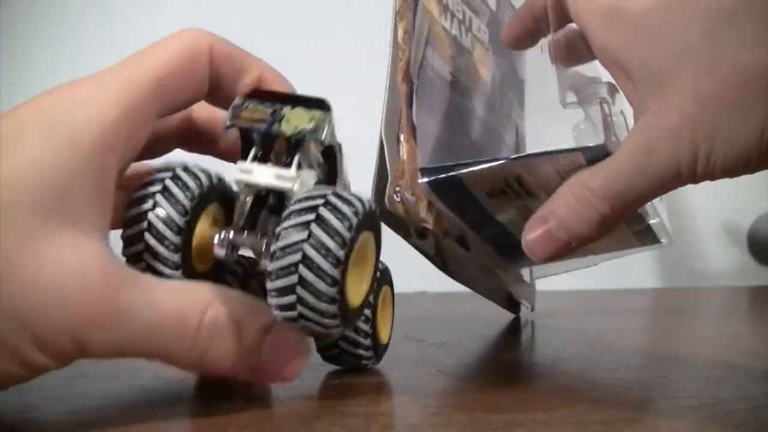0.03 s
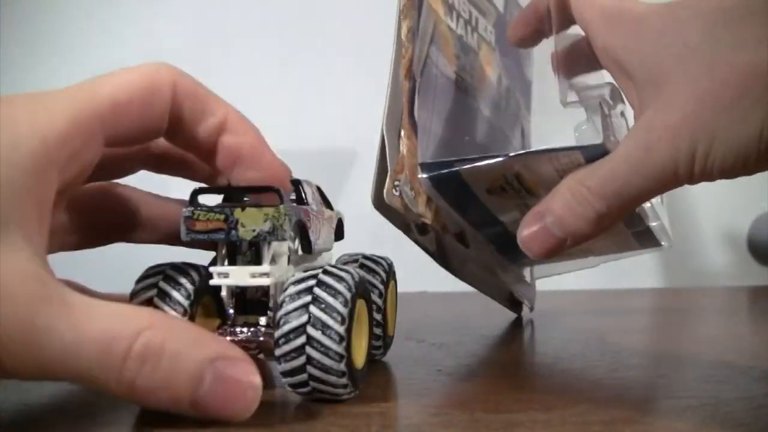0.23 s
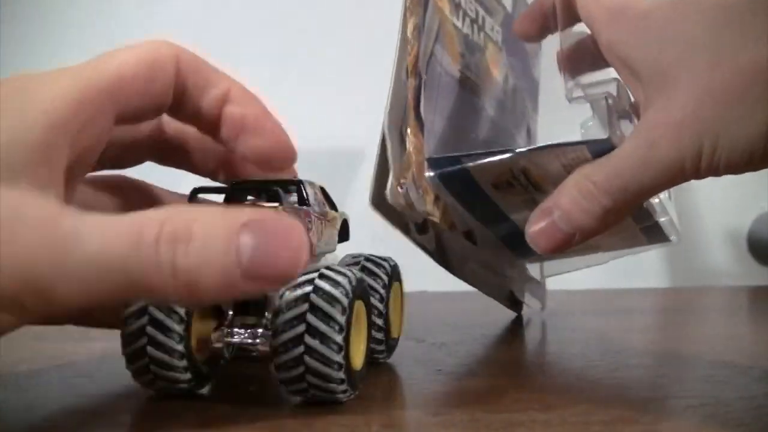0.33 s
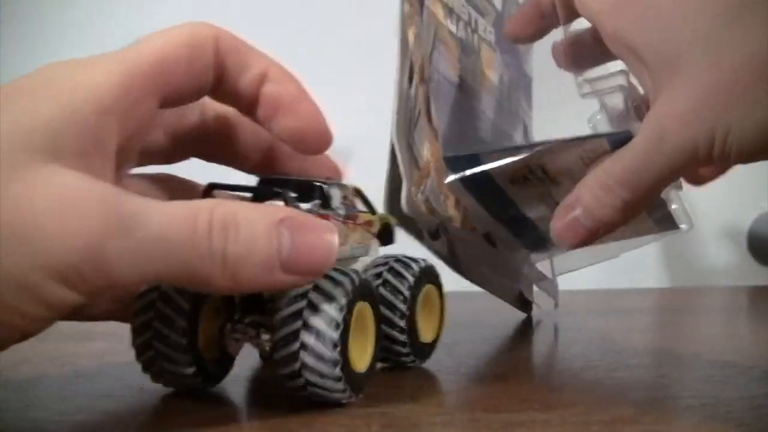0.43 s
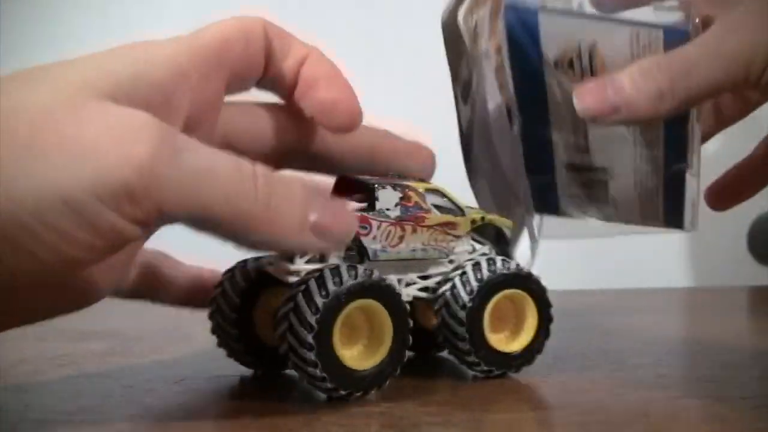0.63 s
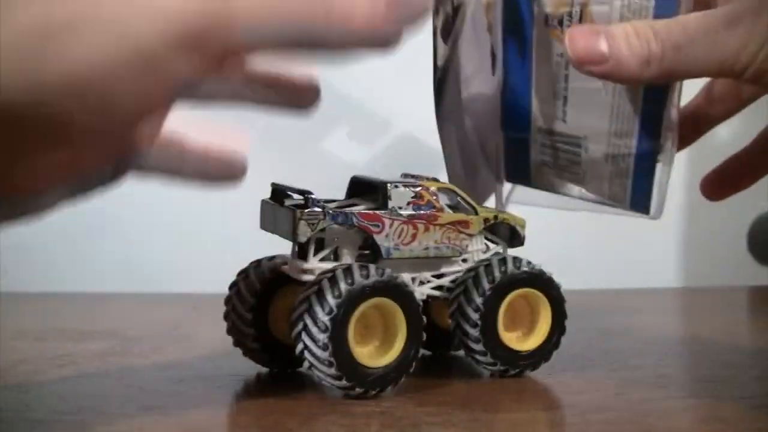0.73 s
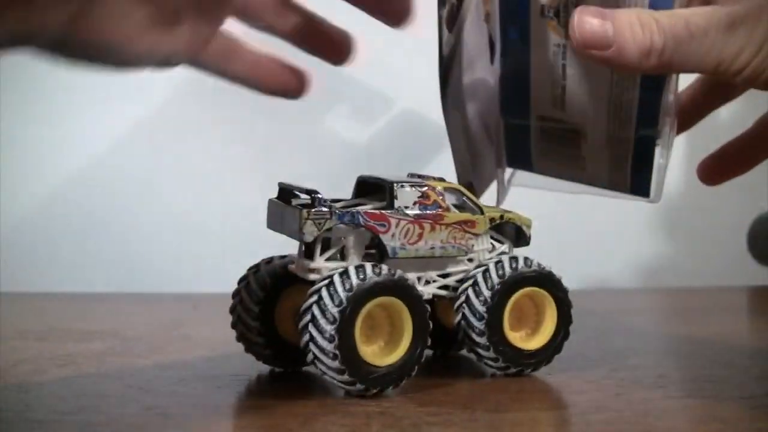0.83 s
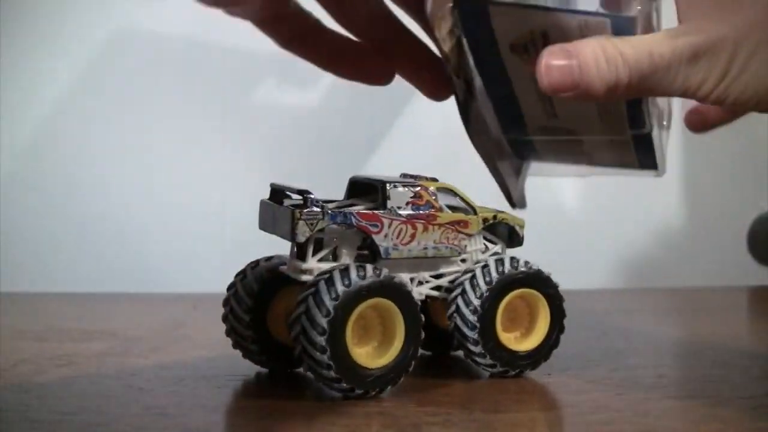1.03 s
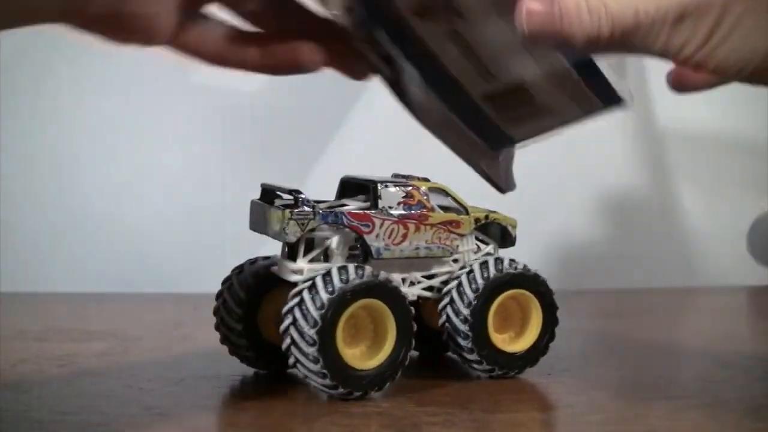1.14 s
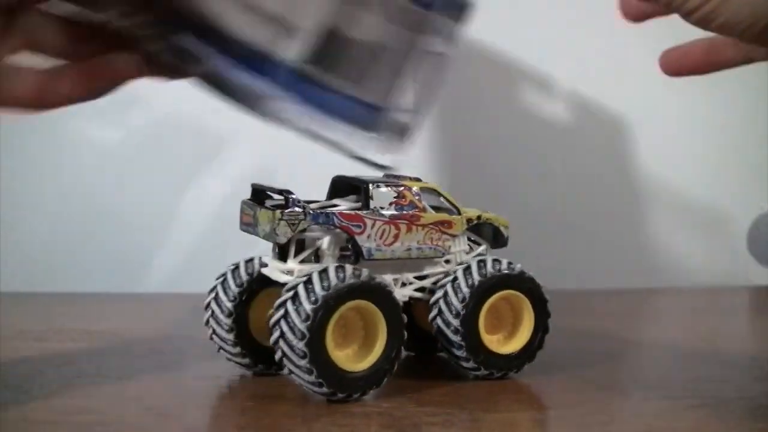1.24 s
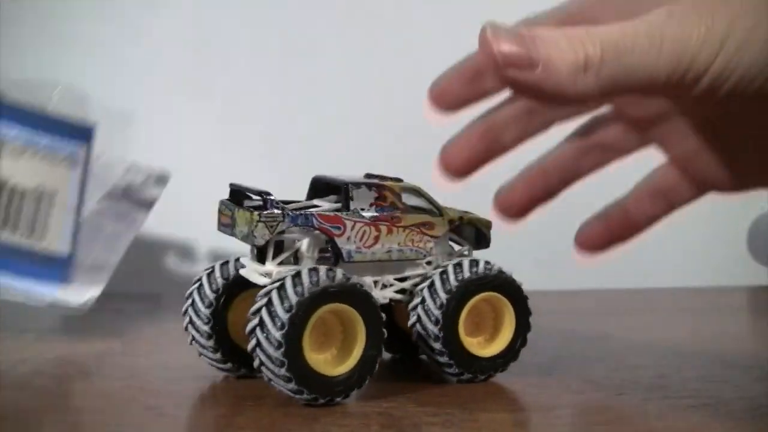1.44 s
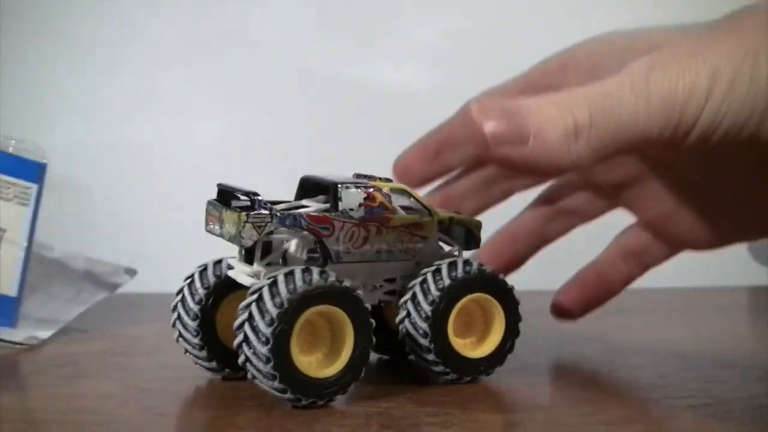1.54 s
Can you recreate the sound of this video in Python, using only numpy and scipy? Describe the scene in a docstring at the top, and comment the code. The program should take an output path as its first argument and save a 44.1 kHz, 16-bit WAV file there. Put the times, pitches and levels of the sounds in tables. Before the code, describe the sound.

Stiff blister packaging knocks, crackles and rustles, just after a small toy truck lands on a table

```python
"""A brief rub of the hands over a faint background, then a toy truck set down on a wooden table in a small
room, close to a two-port microphone: axles clink, wheels land and tyres rumble. A torn card and plastic
blister pack then knocks on the table and is carried off, snapping, crackling and rustling in the hands.
Contacts are filtered pushes with chatter and ringing modes; rolling and rubbing are random tiny slips;
the background is coloured noise. A short diffuse room tail surrounds truck and pack."""
import sys
import numpy as np
from scipy import signal
from scipy.fft import rfft, irfft
from scipy.io import wavfile

SR = 44100
rng = np.random.default_rng(int(sys.argv[2]) if len(sys.argv) > 2 else 0)


def inscribe(sig):
    """Save sig as 16-bit PCM at rate SR to the path in sys.argv[1].

    A 1-D sig is mono; a 2-D sig holds one channel per row.
    Samples are clipped to [-1, 1] before scaling.
    """
    pcm = np.round(np.clip(np.atleast_2d(sig).T, -1, 1) * 32767)
    wavfile.write(sys.argv[1], SR, pcm.astype(np.int16))


N = 70560  # samples, 1.6 s
HZ = np.fft.rfftfreq(8192, 1 / SR)
T = np.arange(N) / SR

# Quiet background of the place: pitch_hz, level_db
FLOOR_COLOUR = [(25, -31), (70, -17.5), (160, -1.5), (400, 5), (800, -0.5), (1300, -3), (4000, -19.5),
                (12000, -39), (16000, -62)]
FLOOR_DB, FLOOR_SIDE_DB = -56, 5  # mid level; side against mid

# Card and plastic rubbing in the hands: time_s, level_db
RUB_LEVELS = [(0, -36.5), (.03, -82), (.19, -59), (.4, -60), (.47, -48.5), (.5, -49), (.59, -47.5),
              (.7, -57.5), (.8, -58.5), (.96, -58.5), (1.015, -43.5), (1.045, -58), (1.13, -48),
              (1.18, -43.5), (1.26, -47), (1.31, -51), (1.36, -60.5), (1.5, -53), (1.6, -59.5)]
# Spectrum of that rubbing: pitch_hz, level_db
RUB_COLOUR = [(60, -51), (250, -5), (550, -5), (700, 2.5), (880, 4.5), (1050, -9.5), (2000, -7),
              (3000, -14.5), (4550, -15.5), (5100, -23.5), (11000, -25), (16000, -38)]
# Fine hiss of sliding skin and film: time_s, level_db
HISS_LEVELS = [(0, -55), (.07, -58.5), (.19, -58.5), (.34, -67), (.42, -66.5), (.47, -58), (.51, -60),
               (.6, -54), (.68, -62), (.8, -68), (.96, -71), (1.02, -53.5), (1.12, -61), (1.19, -55),
               (1.27, -54.5), (1.36, -68), (1.55, -66.5), (1.6, -54.5)]
# Spectrum of that hiss: pitch_hz, level_db
HISS_COLOUR = [(500, -3.5), (4000, -7), (6000, -6.5), (9000, -4.5), (11500, -5.5), (14500, -14),
               (16000, -31)]

# Tyres rumbling on the wood: time_s, level_db
ROLL_LEVELS = [(0, -79), (.08, -51.5), (.13, -34.5), (.185, -53.5), (.21, -42.5), (.33, -48), (.405, -71),
               (.44, -41), (.485, -35), (.503, -39), (.55, -37.5), (.645, -37.5), (.72, -52.5), (.79, -59),
               (.83, -50), (.86, -67), (1.54, -60), (1.575, -45.5), (1.6, -44)]
# Spectrum of the rumble: pitch_hz, level_db
ROLL_COLOUR = [(30, -65), (90, -29), (140, -11.5), (172, 1), (215, 2.5), (255, -10), (310, -3.5),
               (520, -23.5), (750, -18.5), (1100, -30.5), (4000, -49), (16000, -49.5)]

# Loose axles clinking: start_s, level_db, bass_db, treble_db
CLINKS = [(.0933, -13.5, 5, 4), (.0962, -12, -36, 4), (.1113, -18, -8, 4), (.1237, -14, -1, 4),
          (.137, -19, -9, -4), (.2025, -23, 21, 3.5), (.2125, -18, -20, 0.5), (.2175, -1.5, -4.5, -7)]
# Spectrum of the clink contact: pitch_hz, level_db
CLINK_COLOUR = [(40, -15), (200, -30), (450, 7), (750, 9.5), (2200, -2.5), (4200, 8.5), (5200, -1),
                (8000, -1.5), (11500, -2), (13500, -16), (16000, -21)]
# Modes of the axle: pitch_hz, level_db, t60_s
AXLE_MODES = [(208, 13, 0.27), (3120, 8, 0.06), (3880, 21, 0.16), (4270, 7, .06), (4530, 15, 0.06),
              (6650, 9, 0.025)]

# Wheels and chassis hitting the table: start_s, level_db, bass_db, treble_db
LANDINGS = [(.2218, 24.5, -3, -6.5), (.2245, 31.5, 3.5, -19.5), (.2293, 21.5, 7, 3), (.236, 13.5, 1, -28),
            (.2445, 13.5, 5.5, -6.5), (.2612, 13, 15, -1.5), (.3742, 1.5, -30, -15)]
# Spectrum of the landing contact: pitch_hz, level_db
LANDING_COLOUR = [(30, -47), (95, -36), (180, -6), (250, -8.5), (340, 2), (520, -3), (650, -0.5), (800, 1),
                  (1400, -9), (2200, -16), (3800, -13), (4500, -7.5), (5200, -22.5), (10500, -11.5),
                  (13500, -24), (16000, -41)]
# Modes of the truck: pitch_hz, level_db, t60_s
TRUCK_MODES = [(205.3, 7, 0.23), (301, -8, 0.2), (334, 4, 0.06), (643.5, -2, 0.055), (872, 8.5, 0.16),
               (1170, 1, 0.061), (1370, -3.5, 0.048), (1558, -0.5, 0.045), (2080, -8.5, 0.033),
               (2263, -6, 0.087), (3880, -7.5, 0.12), (9100, -17, 0.05)]

# Creases ticking: start_s, level_db, bass_db, treble_db
TICKS = [(.4693, -12.5, 18, -7.5), (.985, -6, -23, -8), (1.1555, -9, -21, -1.5), (1.1812, -5.5, 11, 2.5),
         (1.1835, -6, 15, -9)]
# Spectrum of the tick contact: pitch_hz, level_db
TICK_COLOUR = [(100, -35.5), (800, 9.5), (2500, -7.5), (5000, -10), (9000, -4), (14000, -6.5), (16000, -20)]
# Modes of the blister in the hands: pitch_hz, level_db, t60_s
BLISTER_MODES = [(439, -8, 0.052), (590, -18, 0.12), (719, -12, 0.042), (791, 4, 0.02), (875, -15, 0.094)]

# Pack knocking and juddering on the table: start_s, level_db, bass_db, treble_db, stiff_edge_bite_db
KNOCKS = [(.5083, 28.5, -2, -18.5, 7), (.5115, 21.5, -15, -20, -3), (.5195, 21, 6.5, -25, -8),
          (.5238, 18, 5, 5.5, 5), (.5305, 25.5, 4, -20, -13), (.534, 8, -2, 8, 7),
          (.5452, 21, -5.5, -0.5, -6), (.5505, 17, 10, -10, 2)]
# Spectrum of the knock contact: pitch_hz, level_db
KNOCK_COLOUR = [(35, -46), (100, -36), (300, -22), (520, -10.5), (750, -0.5), (1020, -11.5), (1250, -21),
                (1800, -17.5), (2400, -28), (3600, -19.5), (5500, -34.5), (11500, -37), (16000, -60)]
# Modes of the pack against the table: pitch_hz, level_db, t60_s
RESTING_PACK_MODES = [(294, -2.5, 0.14), (413, -2, 0.065), (720.5, 0, 0.11), (785, 6.5, 0.069)]
# Broad resonance of the stiff edge against the table: pitch_hz, half_width_hz, share_of_bite (ratio)
RESTING_EDGE = [(1790, 180, 1)]

# Blister buckling: start_s, level_db, bass_db, treble_db, stiff_edge_bite_db, flexed_shell_pitch (ratio)
SNAPS = [(.975, 16, -18, 2.5, 11.5, 1.09), (.9925, 6, 3.5, 12.5, 12, 1.09), (.9955, 6.5, 9, -2, 17, 1.04),
         (1.002, 18, -4.5, 11, 7, 0.845), (1.0038, 24.5, -6.5, -11, 8, 1.06), (1.017, 0, -8, 10, 0, 1),
         (1.0572, 15.5, -7.5, -9, -3, 0.98), (1.0888, 17, 5, 1.5, -10.5, 0.922),
         (1.1505, 7, -23, 5, 8.5, 0.925), (1.159, 11, 6, 1.5, -5, 1.073), (1.208, -7, 21, -28, 8, 0.65),
         (1.272, -7, -5, -14, -4, 0.84), (1.297, 1.5, -14, -25, 6, 1.01), (1.393, -4.5, 1.5, 1.5, 6, 0.92),
         (1.598, 14, -21, -10, 2, 0.62)]
# Spectrum of the snap contact: pitch_hz, level_db
SNAP_COLOUR = [(35, -60), (100, -32.5), (330, -11), (520, -14), (700, 0.5), (880, -9.5), (1120, -14),
               (1500, -14.5), (2000, -17), (3000, -21), (4400, -25), (5500, -33), (11500, -43.5),
               (16000, -54)]
# Broad resonances of the stiff edge in the hands: pitch_hz, half_width_hz, share_of_bite (ratio)
HELD_EDGE = [(2080, 290, 1), (3770, 350, 0.62)]

# Broad card flexing with a soft low push: start_s, level_db
FLEXES = [(0.975, 8), (0.992, -3)]
CARD_HZ, CARD_T60_S = 139, 0.12

# Decay of the small room: pitch_hz, t60_s
ROOM_DECAY = [(150, 0.3), (600, 0.23), (1500, 0.15), (4000, 0.16), (10000, 0.12)]
# Width of the room tail: pitch_hz, side_minus_mid_db
ROOM_WIDTH = [(60, -18), (170, -32), (500, -11), (1100, -19), (2200, -34), (4500, -30), (11000, -19)]
# Phase by which the left microphone port leads: pitch_hz, lead_radians
PORT_LEAD = [(100, 0.15), (2500, 0.13), (5000, 0.22), (9000, 0.92), (12500, 1.1), (16000, 1.8)]
# Level balance of the microphone ports: pitch_hz, left_minus_right_db
PORT_LEAN = [(60, -1), (150, 0), (380, 1), (950, 1.5), (2380, 0), (5000, 0.1), (12000, -0.5)]

BASS_HZ, MIDDLE_HZ, TREBLE_HZ = 233, 764, 6200  # where each contact's tilt is set
CHATTER_HZ, RING_LOW_HZ = 1152, 146  # chatter lies above the first; the ringing is cut below the second
EDGE_HZ = 16300  # upper band limit


def amp(db):
    """Decibels to gain."""
    return 10 ** (np.asarray(db) / 20)


def evened(x):
    """Scales to rms 1."""
    return x / np.sqrt(np.mean(x ** 2) + 1e-20)


def read(points, hz=HZ):
    """Reads a table on a log-frequency axis."""
    f, value = np.transpose(points)
    return np.interp(np.log(hz + 1), np.log(f + 1), value)


def add(mix, s, sound):
    """Mixes a sound in at time s, cut off at the end of the mix."""
    part = mix[max(round(s * SR), 0):][:len(sound)]
    part += sound[:len(part)]


def above(x, hz):
    """Second-order high-pass."""
    return signal.sosfilt(signal.butter(2, hz, "high", fs=SR, output="sos"), x)


def colour(x, db):
    """Causal minimum-phase filter with the given gain at each frequency."""
    log_gain = np.log(amp(np.r_[db, db[-2:0:-1]]))
    response = np.exp(np.conj(signal.hilbert(log_gain)))
    taps = np.fft.ifft(response).real[:len(db)]
    return signal.fftconvolve(x, taps)[:len(x)]


def background():
    """Quiet background: a coloured noise in mid, with an independent coloured noise in side."""
    mid, side = [evened(colour(rng.standard_normal(N), read(FLOOR_COLOUR))) for _ in range(2)]
    return amp(FLOOR_DB) * (mid + np.outer([1, -1], side) * amp(FLOOR_SIDE_DB))


def friction(levels, spectrum, grains_per_s, spread_db):
    """Random tiny slips of uneven size, coloured by what they excite."""
    size = amp(spread_db * np.minimum(rng.exponential(1, N), 4))
    slipping = rng.random(N) < grains_per_s / SR
    slips = size * rng.standard_normal(N) * slipping
    level_db = np.interp(T, *np.transpose(levels))
    return evened(colour(slips, read(spectrum))) * amp(level_db)


def handling():
    """Card and plastic rub in the hands, with the finer slips of sliding skin and film."""
    rub = friction(RUB_LEVELS, RUB_COLOUR, grains_per_s=9000, spread_db=3.0)
    hiss = friction(HISS_LEVELS, HISS_COLOUR, grains_per_s=26000, spread_db=3.0)
    return rub + hiss


def rolling():
    """Tyres rumble on the wood as a stream of tiny slips."""
    return friction(ROLL_LEVELS, ROLL_COLOUR, grains_per_s=2000, spread_db=2.0)


def ringing(modes, pitch, swell_s, t):
    """An object's modes swell and ring down, each at its own rate."""
    ring = np.zeros(len(t))
    for hz, mode_db, t60_s in modes:
        shape = (1 - np.exp(-t / swell_s)) * amp(-60 * t / t60_s)
        ring += amp(mode_db) * 2 * shape / shape.sum() * np.sin(2 * np.pi * hz * pitch * t)
    return above(ring, RING_LOW_HZ)


def hits(rows, spectrum, modes, swell_s, chatter_db, chatter_s, edge=()):
    """Each contact is a sharp push and a bright, dying chatter of tiny slips; the object's modes swell and ring."""
    out, t = np.zeros(N), T[:SR // 3]
    # offsets the treble that the chatter adds to the push
    balance = 10 * np.log10(1 + amp(chatter_db) ** 2 * HZ ** 4 / (HZ ** 4 + CHATTER_HZ ** 4))
    bite = sum(share * np.exp(-((HZ - hz) / width) ** 2) for hz, width, share in edge)

    def hit(db, bass_db, treble_db, bite_db=0, pitch=1):
        """One contact with its own tilt, edge bite and pitch."""
        ring = ringing(modes, pitch, swell_s, t)
        slips = above(rng.standard_normal(len(t)) * np.exp(-t / chatter_s), CHATTER_HZ)
        push = (t == 0) + amp(chatter_db) * slips / np.linalg.norm(slips)
        contact = colour(push, read(spectrum) - balance + bite_db * bite)
        tilt = read([(BASS_HZ, bass_db), (MIDDLE_HZ, 0), (TREBLE_HZ, treble_db)])
        return colour(contact + ring, db + tilt)

    for start_s, *settings in rows:
        add(out, start_s, hit(*settings))
    return out


def clinks():
    """Loose axles clink: short contacts set the metal modes ringing."""
    return hits(CLINKS, CLINK_COLOUR, AXLE_MODES, swell_s=0.00045, chatter_db=26, chatter_s=0.0032)


def landing():
    """Wheels and chassis hit the table and ring the truck's modes."""
    return hits(LANDINGS, LANDING_COLOUR, TRUCK_MODES, swell_s=0.00059, chatter_db=12.5, chatter_s=0.0033)


def ticks():
    """Creases tick and excite the blister's modes."""
    return hits(TICKS, TICK_COLOUR, BLISTER_MODES, swell_s=0.0012, chatter_db=3, chatter_s=0.0027)


def knocks():
    """The pack knocks and judders on the table, its stiff edge biting."""
    return hits(KNOCKS, KNOCK_COLOUR, RESTING_PACK_MODES, swell_s=0.0016, chatter_db=21.5,
                chatter_s=0.0075, edge=RESTING_EDGE)


def snaps():
    """The blister buckles in the hands; each flex of the shell shifts its modes in pitch."""
    return hits(SNAPS, SNAP_COLOUR, BLISTER_MODES, swell_s=0.0071, chatter_db=11.0,
                chatter_s=0.0047, edge=HELD_EDGE)


def card():
    """The backing card gives a low, quickly damped swing when it is gripped."""
    out, shape = np.zeros(N), amp(-60 * T / CARD_T60_S)
    swing = 2 * shape / shape.sum() * np.sin(2 * np.pi * CARD_HZ * T)
    for start_s, level_db in FLEXES:
        add(out, start_s, amp(level_db) * swing)
    return out


def room(x, wet_db, build_s):
    """Adds a short diffuse tail that dies band by band, its width varying with frequency."""
    noise = rng.standard_normal((2, SR // 2))  # mid and side
    hz, t, bands = signal.stft(noise, SR, nperseg=256)
    bands[1] *= amp(read(ROOM_WIDTH, hz))[:, None]
    decay = amp(-60 * t / read(ROOM_DECAY, hz)[:, None])
    tail = signal.istft(bands * decay, SR, nperseg=256)[1]
    tail *= np.minimum(T[:tail.shape[1]] / build_s, 1)
    tail /= np.linalg.norm(tail[0])
    mid, side = signal.fftconvolve(x[None], tail, axes=1)[:, :N]
    return x + amp(wet_db) * np.array([mid + side, mid - side])


def scene():
    """Truck and pack in the small room, over its quiet background."""
    truck = rolling() + clinks() + landing()
    pack = handling() + ticks() + knocks() + snaps() + card()
    return background() + room(truck, wet_db=-11.0, build_s=0.0077) + room(pack, wet_db=-14.0, build_s=0.0095)


def record(dry):
    """Two close microphone ports differ in phase and level; then the overload limit and the band limit."""
    hz = np.fft.rfftfreq(2 * N, 1 / SR)
    difference = np.log(amp(read(PORT_LEAN, hz))) + 1j * read(PORT_LEAD, hz)
    port = np.exp(np.outer([.5, -.5], difference))  # half to each port
    pair = irfft(rfft(dry, 2 * N) * port)[:, :N]
    limited = np.clip(pair, -1, 1)
    band_limit = signal.firwin(255, EDGE_HZ, window=("kaiser", 8), fs=SR)
    return signal.oaconvolve(limited, band_limit[None], "same")


dry = scene()
out = record(dry)
inscribe(out)
```